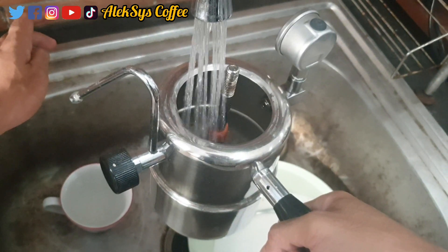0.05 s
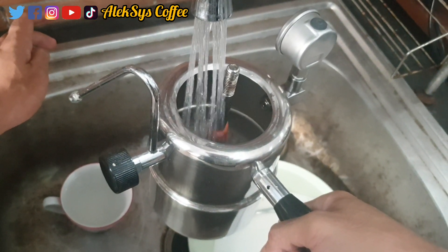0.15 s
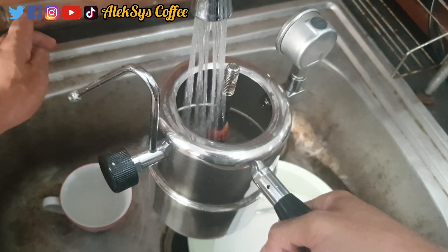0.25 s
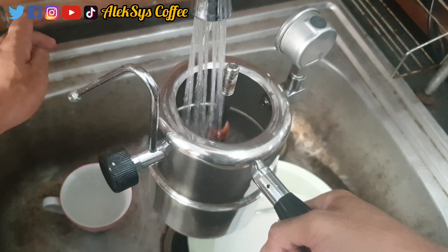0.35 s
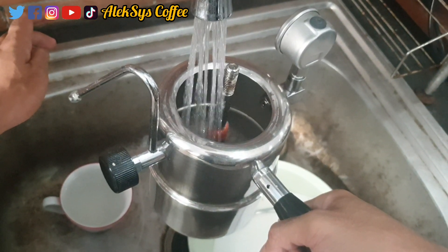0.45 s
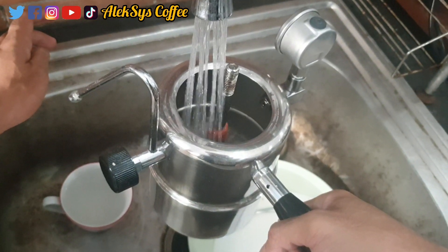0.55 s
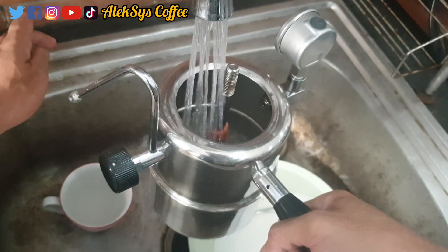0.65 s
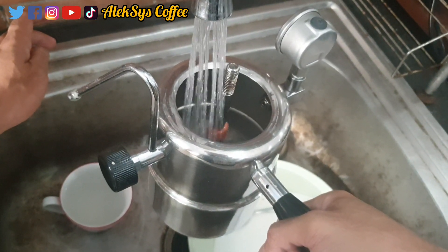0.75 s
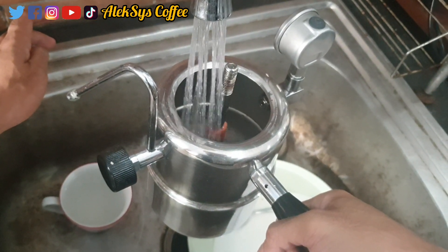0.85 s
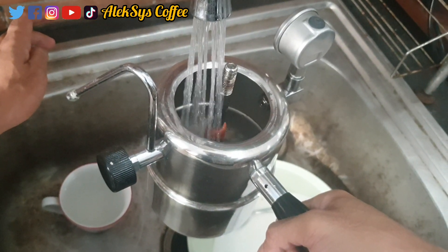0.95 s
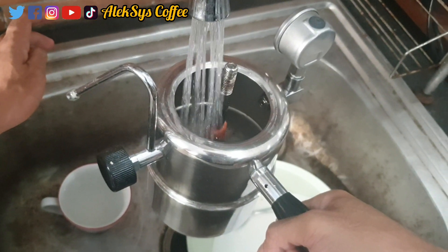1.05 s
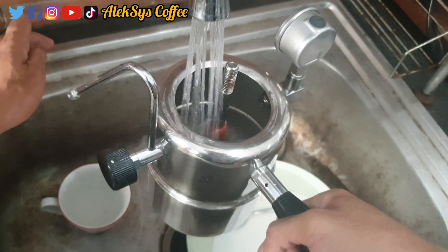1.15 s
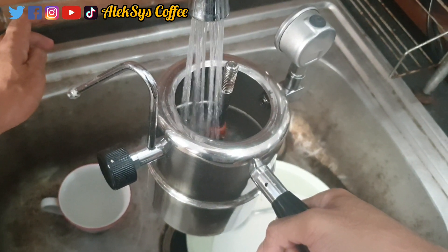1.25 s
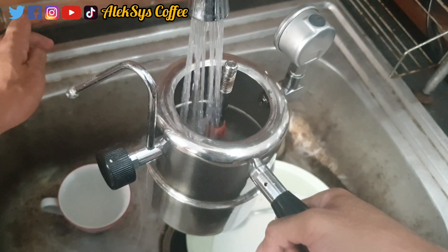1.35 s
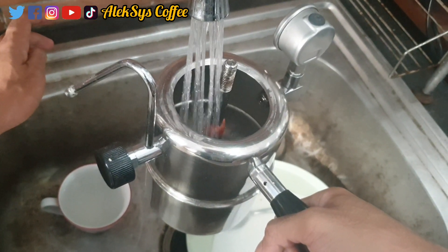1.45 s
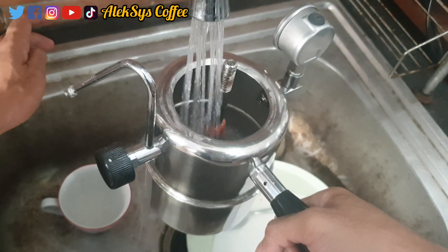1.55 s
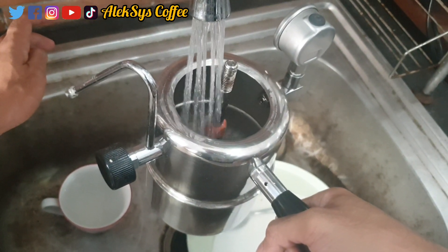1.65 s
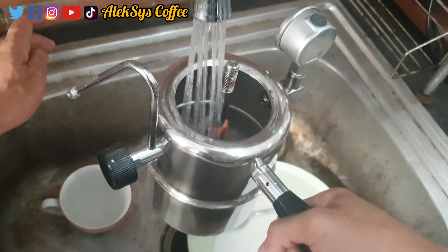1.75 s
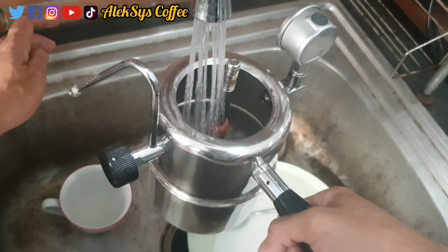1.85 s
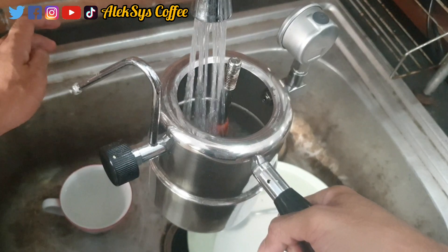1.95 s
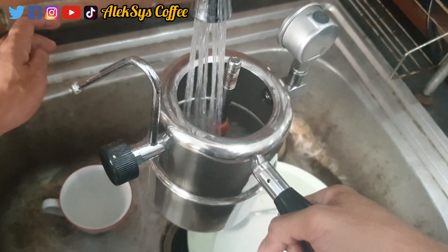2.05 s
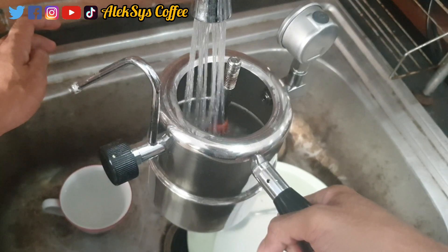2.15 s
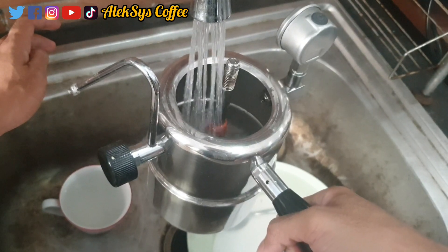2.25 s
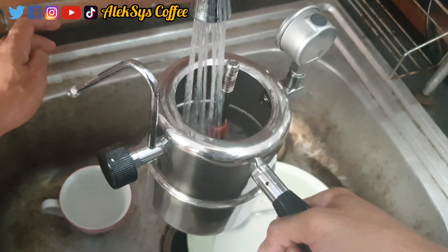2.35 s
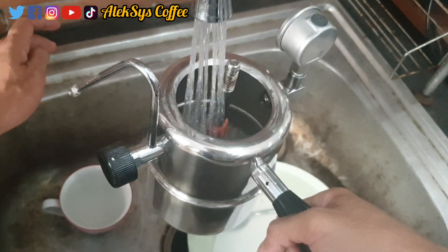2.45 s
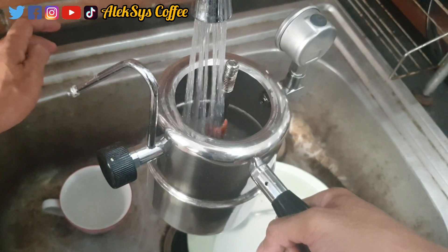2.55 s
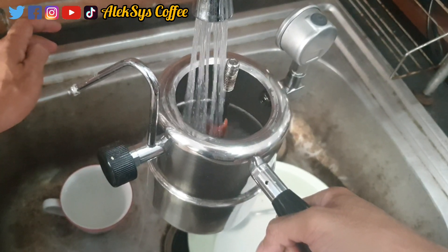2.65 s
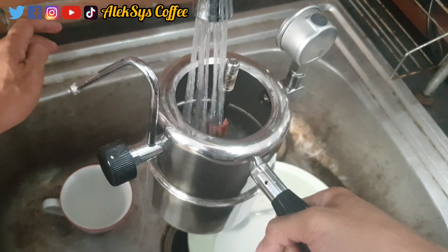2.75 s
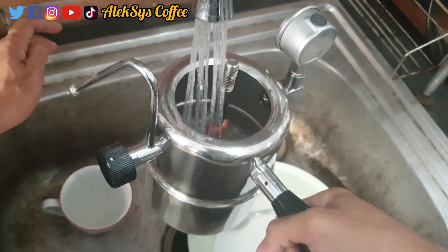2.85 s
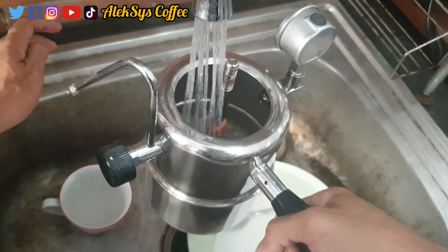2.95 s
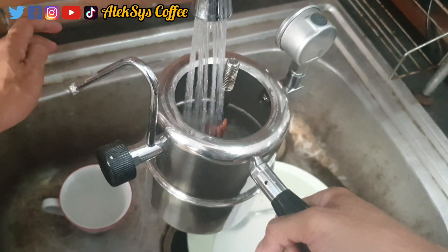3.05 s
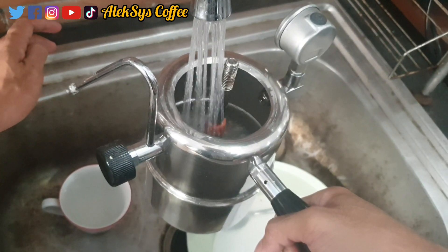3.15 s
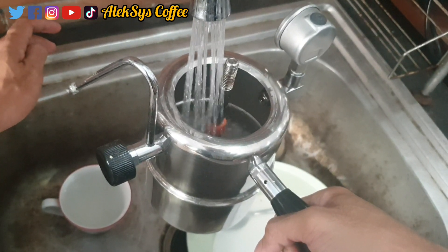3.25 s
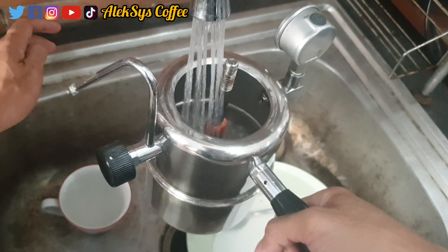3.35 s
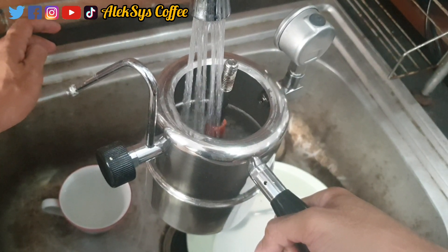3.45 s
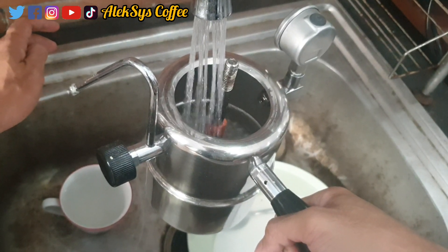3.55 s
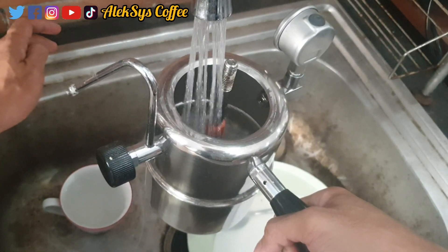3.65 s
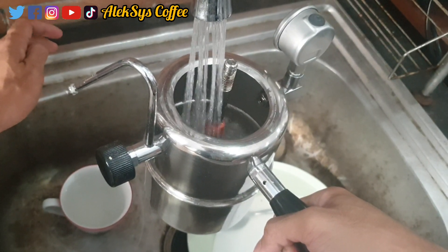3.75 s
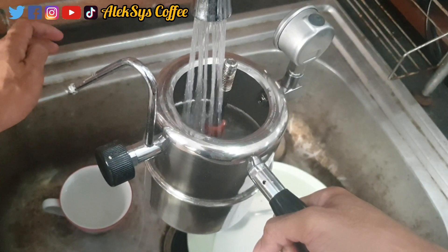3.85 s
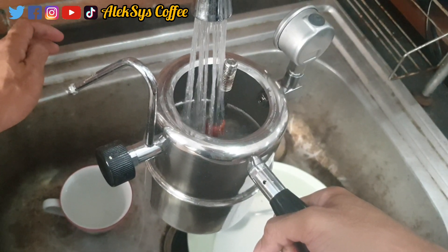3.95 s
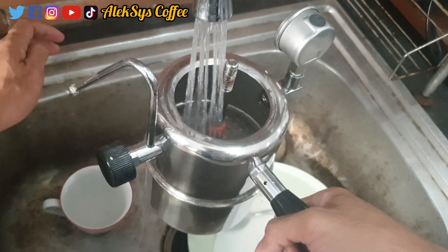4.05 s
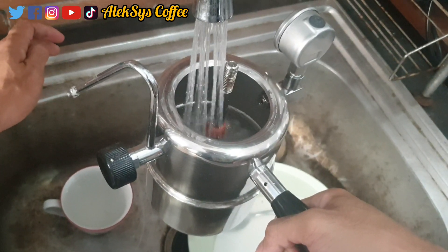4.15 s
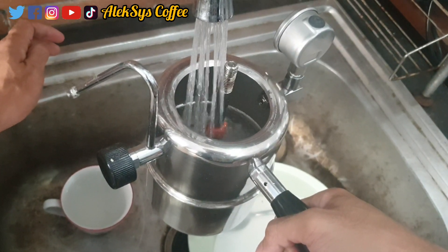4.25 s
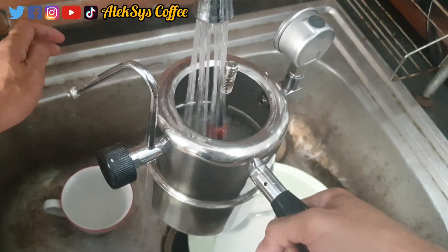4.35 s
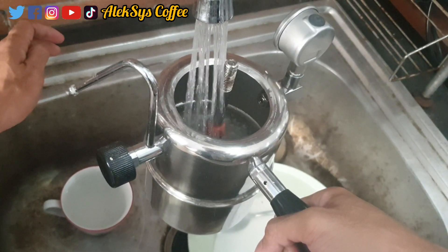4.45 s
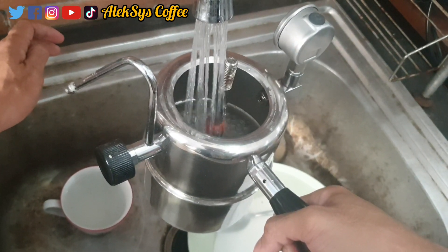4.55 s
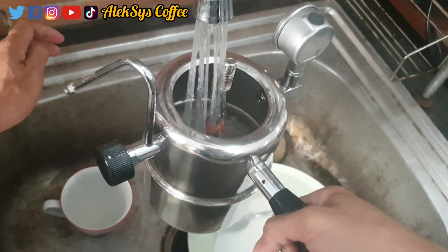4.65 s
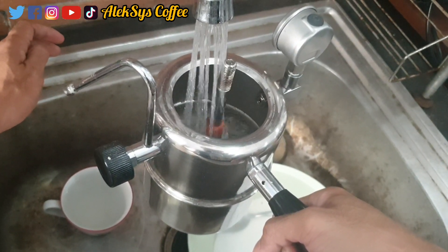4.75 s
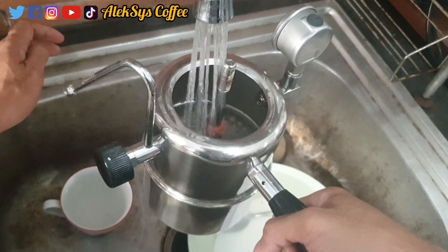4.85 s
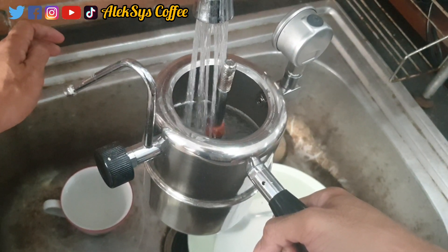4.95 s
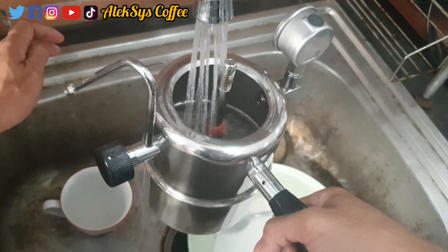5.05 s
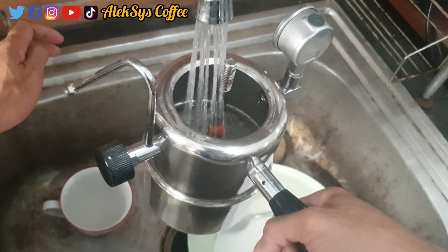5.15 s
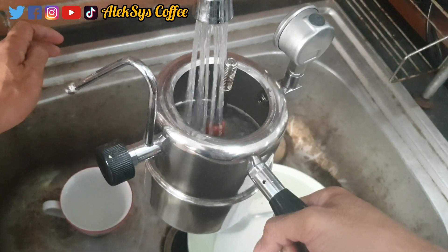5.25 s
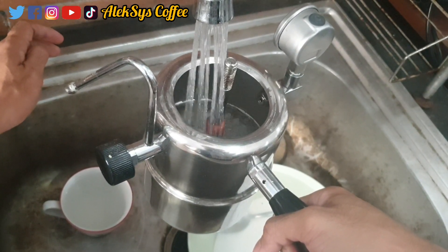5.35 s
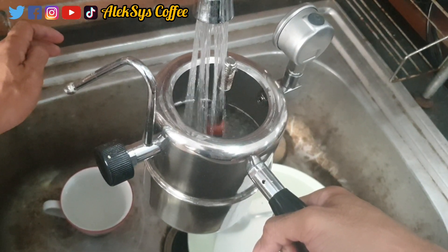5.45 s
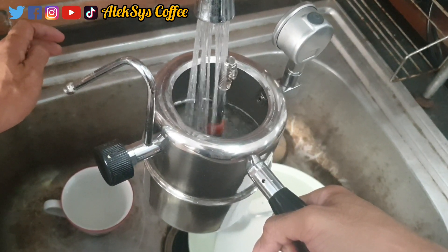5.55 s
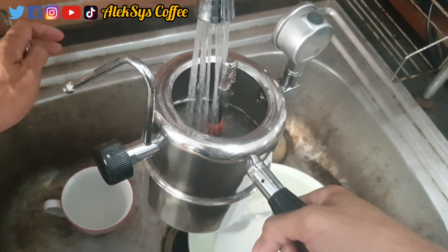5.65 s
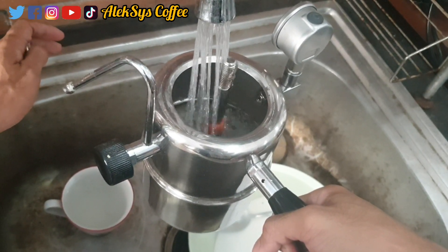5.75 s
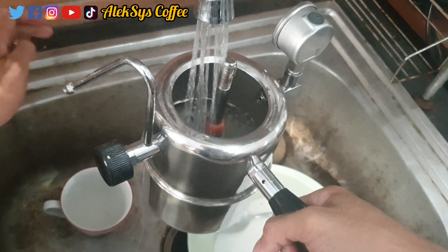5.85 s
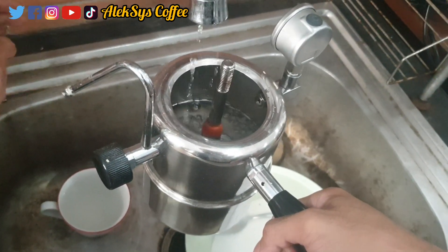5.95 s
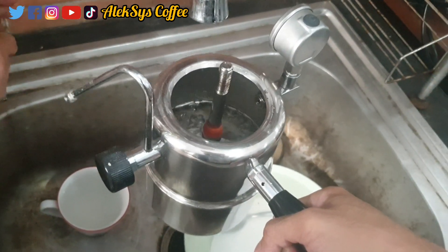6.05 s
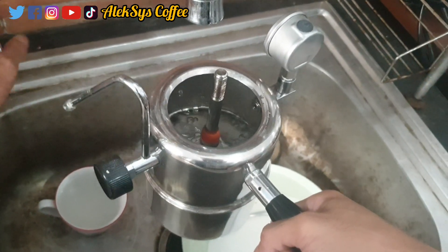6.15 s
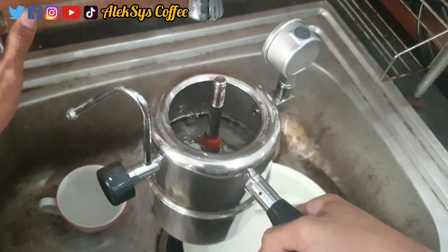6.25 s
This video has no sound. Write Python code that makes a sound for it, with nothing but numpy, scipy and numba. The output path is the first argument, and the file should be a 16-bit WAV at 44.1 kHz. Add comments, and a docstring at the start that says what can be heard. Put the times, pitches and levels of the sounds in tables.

```python
"""You hear water hissing, gulping and ticking into a small steel pot in a kitchen sink, until the tap is shut.
Jets from the spray tap drag air under as bubbles and make the steel ring. The air above the water
sounds hollow, and its overtones climb as the pot fills. The pipes rumble softly underneath.
A hand-held phone listens close by: its right microphone is open, while the left one is covered
by the hand and hears muffled water with the hand's rubs and knocks."""
import sys
import numpy as np
from scipy import signal
from scipy.fft import rfft, irfft, next_fast_len
from scipy.io import wavfile
from scipy.ndimage import uniform_filter1d
from numba import njit

SR = 44100
rng = np.random.default_rng(int(sys.argv[2]) if len(sys.argv) > 2 else 0)


def unload_wav(signal):
    """Save mono or channel-first audio to the path in sys.argv[1] as 16-bit WAV at rate SR, clipped to [-1, 1]."""
    wavfile.write(
        sys.argv[1],
        SR,
        np.round(np.clip(np.atleast_2d(signal).T, -1, 1) * 32767).astype(np.int16),
    )


N = 278006
T = np.arange(N) / SR
SHUT_S = 5.92  # the tap is shut


def undb(db):
    """Turn decibels into a factor to multiply by."""
    return 10 ** (np.asarray(db) / 20)


def level(x, db):
    """Scale a sound to an average (rms) level."""
    return x * undb(db) / np.sqrt(np.mean(x ** 2))


def curves(table):
    """Join a table's points in time with straight lines: one curve for each value column."""
    times, *columns = np.transpose(table)
    return [np.interp(T, times, column) for column in columns]


def shut(db_per_s):
    """Change in dB: zero while the tap runs, then falling steadily."""
    return -db_per_s * np.maximum(T - SHUT_S, 0)


@njit
def moving_band(x, hz, width):
    """A filter that lets through the sound near one pitch; that pitch may move."""
    y, mid, low, tuning, damping = np.empty(len(x)), 0., 0., 0., 0.
    for i in range(len(x)):
        if i % 16 == 0:
            tuning, damping = np.tan(np.pi * hz[i] / SR), width[i] / hz[i]
        swing = (mid + tuning * (x[i] - low)) / (1 + tuning * (tuning + damping))
        mid, low = 2 * swing - mid, low + 2 * tuning * swing
        y[i] = damping * swing
    return y


def band(x, hz, width):
    """One resonance, a pitch at which something likes to ring; the width is in Hz too."""
    return moving_band(x, hz + 0. * T, width + 0. * T)


def steep_band(x, hz, width):
    """The same resonance twice, so less gets through on either side."""
    return band(band(x, hz, width), hz, width)


def modes(x, table):
    """Add up resonances (f/Hz, width/Hz, level/dB), flipping the sign of every other one."""
    return sum((-1) ** k * undb(db) * steep_band(x, hz, width) for k, (hz, width, db) in enumerate(table))


def noise(flicker_db=0, flicker_hz=20):
    """Noise whose loudness flickers at random around a steady average."""
    step = int(SR / flicker_hz)
    stairs = np.repeat(rng.standard_normal(N // step + 1), step)
    walk = uniform_filter1d(uniform_filter1d(stairs, step), step)[:N]
    walk = walk - uniform_filter1d(walk, 6 * step)  # take out slow drift
    return rng.standard_normal(N) * undb(flicker_db * walk / walk.std())


def colour(x, spectrum):
    """Turn pitches up or down along a curve of (f/Hz, level/dB) points."""
    hz, db = np.transpose(spectrum)
    n = next_fast_len(N)
    freqs = np.maximum(np.arange(n // 2 + 1) * SR / n, 1)
    gain = undb(np.interp(np.log(freqs), np.log(hz), db))
    return irfft(rfft(x, n) * gain, n)[:N]


@njit
def ring(starts, hz, sizes, cycles, glide, rise):
    """Bubble tones: swell over `rise` cycles, fade 60 dB over `cycles`, go up by the share `glide`."""
    y = np.zeros(N)
    for j in range(len(starts)):
        length, start = cycles / hz[j] * SR, int(starts[j] * SR)
        phase, fade, held_back = 0., sizes[j], 1.
        fall, release = 1000. ** (-1 / length), np.exp(-hz[j] / SR / rise)
        for i in range(min(int(length), N - start)):
            phase += 2 * np.pi * hz[j] * (1 + glide * i / length) / SR
            fade, held_back = fade * fall, held_back * release
            y[start + i] += fade * (1 - held_back) * np.sin(phase)
    return y


def swarm(count, lo_hz, hi_hz, cycles, spread_db, glide, rise):
    """Bubbles at random times and pitches; a wider spread makes a few of them stand out."""
    when, pitch, loud = rng.random((count, 3)).T
    sizes = undb(-spread_db * np.log(1 - .995 * loud))
    hz = lo_hz * (hi_hz / lo_hz) ** pitch
    return level(ring(when * N / SR, hz, sizes, cycles, glide, rise), 0)


def listed_rings(table, cycles, glide, rise):
    """One bubble tone for each row (t/s, level/dB, f/Hz)."""
    starts, db, hz = np.transpose(table)
    return ring(starts, hz, undb(db), cycles, glide, rise)


def ragged(x, share=.31):
    """Roughen a tone by shaking its loudness at random."""
    return x * (1 - share + share * level(band(noise(), 250, 1100), 0))


def with_spatter(table, droplets=3, within_s=.03):
    """Each drop throws up weaker droplets that land just after it, at nearby pitches."""
    starts, db, hz = np.repeat(table, droplets, axis=0).T
    late, weak, bend = rng.random((len(starts), 3)).T
    small = np.transpose([starts + .004 + within_s * late, db - 9.5 - 8 * weak, hz * (.85 + .283 * bend)])
    return np.vstack([table, small])


def air_overtones(lift_db):
    """Two high resonances of the air in the pot, which climb as it fills."""
    # t/s, first f/Hz, second f/Hz, second level/dB
    overtones = [(0, 1790, 2527, -16.5), (2.6, 2070, 2680, -21), (3.1, 2120, 2780, -25),
                 (3.6, 2100, 2910, -21.5), (6.3, 2280, 2986, -15.5)]
    first_hz, second_hz, second_db = curves(overtones)
    wander = 1 + .015 * level(band(noise(), 7, 12), 0)  # the surface heaves
    return [(first_hz, 550, -19.5 - .47 * T + lift_db), (second_hz * wander, 193, second_db + lift_db)]


def basin_modes(lift_db):
    """Resonances of pot and sink that hold their pitch while their strength changes."""
    # f/Hz, width/Hz, level/dB
    basin = [(290, 110, -38), (530, 80, -12), (765, 110, -16), (945, 130, -23), (1060, 70, -30),
             (1375, 170, -31), (1715, 80, -27), (1900, 60, -17)]
    rows = []
    for hz, width, db in basin:
        if hz > 850:  # rung by the jets themselves
            db = db + lift_db
        if 850 < hz < 1200:  # these open up as the water nears the rim
            db = db + 1.14 * T
        if 700 < hz < 850:
            db = db - .2 * T
        rows.append((hz, width, db))
    return rows


def churn(air_note, cloud_note, spray_db):
    """Jets drag air under; swirling water and big bubbles stir up the hollow notes of pot and sink."""
    # loudest at half depth, then damped by the deepening water: t/s, level/dB
    loudness = [(0, -38), (.8, -34.5), (1.3, -32), (2.9, -29.5), (3.6, -34), (4.8, -37), (5.85, -38.5)]
    slosh_db = 1.5 * np.exp(-((T - SHUT_S) / .036) ** 2)  # the collapsing jets drop in at once
    churn_db = curves(loudness)[0] + slosh_db + shut(db_per_s=134.5)
    bubbles = swarm(count=1500, lo_hz=366, hi_hz=2823, cycles=18.2, spread_db=0, glide=.2, rise=.37)
    push = noise(.33, 25.21) + undb(-16) * bubbles
    # the high resonances follow the spray's loudness, but die away more slowly
    lift_db = spray_db + 2 - churn_db - shut(db_per_s=122)
    bottom = (300, 70, -9 - 20 * T)  # the thinly covered bottom booms until the water damps it
    body = modes(push, [air_note, cloud_note, bottom] + air_overtones(lift_db))
    body = body + modes(push, basin_modes(lift_db))
    body = body - band(body, 872, 110)  # two resonances of the sink cancel here
    hollow = undb(churn_db) * body
    wanted_rms = np.std(undb(churn_db) * level(push, -.36))
    return hollow * wanted_rms / hollow.std()


def steel_ring(push):
    """Steel and hollows ring unevenly under the shifting jets, and change as water loads the wall."""
    # empty f/Hz, full f/Hz, width/Hz, empty level/dB, full level/dB
    steel = [(3650, 4100, 490, 6, -8), (4980, 4990, 40, -1.5, 8), (5650, 5420, 220, -1.5, 4),
             (6570, 6500, 91, -10, 4), (7210, 7100, 260, -6.5, 5), (7570, 7510, 90, -9, 8),
             (8560, 8570, 280, -5, 3.5), (8970, 8970, 150, 6.5, 8), (10180, 10200, 160, -1.5, 4),
             (10830, 10830, 230, -8, -1), (11660, 11750, 450, -3, -0.5), (12800, 12750, 320, -4, -6),
             (14000, 14000, 300, -6, 0), (14550, 9000, 60, -9, -3)]
    filled = T / T[-1]
    ringing = np.zeros(N)
    for empty_hz, full_hz, width, empty_db, full_db in steel:
        flicker_db = 2.5 * level(band(noise(), 3.9, 8.7), 0)
        db = empty_db + (full_db - empty_db) * filled + flicker_db
        ringing += undb(db) * band(push, empty_hz + (full_hz - empty_hz) * filled, width)
    return ringing


def spray():
    """The hiss of the jets and of tiny bursting bubbles, coloured by the steel."""
    # tone of the hiss: f/Hz, level/dB
    spectrum = [(590, -61), (1000, -29), (1160, -11.5), (1910, -2), (2580, -10), (4380, -11.5), (4870, -6),
                (7990, -5), (8870, -1.5), (13100, -4), (15800, -3.5)]
    fizz = swarm(count=2500, lo_hz=4640, hi_hz=15800, cycles=60, spread_db=2, glide=.16, rise=.28)
    spatter = swarm(count=1200, lo_hz=5860, hi_hz=15000, cycles=14, spread_db=3.5, glide=.046, rise=.25)
    jets = band(noise(1.4, 55), 4500, 6000) + band(noise(1.2, 90), 11500, 9000)
    fizz_db = -5.5 - .8 * T  # weaker as the water has less far to fall
    push = level(jets, 0) + undb(fizz_db) * fizz + undb(-8.5) * spatter
    push = push + steel_ring(push)
    sizzle = undb(4.5 * T) * level(steep_band(push, 13002, 2600), -33.5)  # grows as the surface rises
    return level(colour(push, spectrum), -1.31) + sizzle


def plumbing():
    """The low rumble of pipe and sink, with a steadier hum on top."""
    # t/s, rumble level/dB, hum level/dB
    loudness = [(0, -69, -75), (.42, -75, -76), (.46, -59, -62), (1.7, -61, -63.5), (2.4, -58, -59.5),
                (3.05, -55, -64), (3.9, -60, -63.5), (4.6, -58.5, -60), (5.1, -57, -61), (5.75, -57.5, -53),
                (5.9, -58, -49), (5.96, -56.5, -68), (6.3, -61.5, -66)]
    rumble_db, hum_db = curves(loudness)
    deep = level(band(band(noise(2, 5), 90, 90), 90, 140), -2)
    pipe = level(band(noise(), 89, 24), -7)
    upper = level(steep_band(noise(), 212, 120), -13.5)
    hum = level(band(band(noise(), 158, 5), 158, 30), -1.7)
    return undb(rumble_db) * (deep + pipe + upper) + undb(hum_db) * hum


def room_noise():
    """The faint background rush of the kitchen."""
    # f/Hz, level/dB
    spectrum = [(120, -42), (200, -5), (681, 4), (879, -7), (1020, 1), (1760, -14), (2320, -11),
                (11400, -8), (15800, -17)]
    return level(colour(noise(1, 10), spectrum), -59)


def single_bubbles():
    """Single bubbles ring out of the stream, from deep glugs to small plinks with a little splash."""
    # t/s, level/dB, f/Hz
    bubbles = [(0.1306, -31, 3600), (0.173, -22, 3880), (0.2389, -25, 3680), (0.4229, -28.5, 3600),
               (0.5526, -31, 1840), (0.6165, -28, 3600), (0.7452, -29, 3580), (0.8505, -30.5, 3720),
               (1.1223, -31, 3870), (1.1732, -29, 3780), (1.3179, -30, 1900), (1.4696, -28, 3900),
               (1.5052, -25, 1950), (1.707, -31.5, 3740), (1.7554, -29, 3950), (1.8262, -31, 3880),
               (1.9358, -28, 2080), (2.1969, -32, 3850), (2.2243, -31, 3800), (2.4558, -27, 3620),
               (2.4698, -32, 2200), (2.4838, -30, 4000), (2.9886, -31.5, 3930), (3.0761, -33, 1910),
               (3.5079, -34, 3960), (3.8432, -33.5, 2190), (4.4418, -31, 2290), (4.592, -29, 399),
               (5.026, -27, 379), (5.248, -30, 382), (1.615, -32, 767), (1.80, -32, 724),
               (2.78, -29.5, 737), (3.95, -29.5, 722), (5.949, -32.5, 693), (6.008, -37, 700)]
    tones = listed_rings(with_spatter(bubbles), cycles=52.5, glide=.078, rise=.93)
    outline = uniform_filter1d(np.abs(band(tones, 3700, 2000)), size=60)
    splash = outline * band(noise(), 3600, 2500)
    return ragged(tones) + undb(-12) * splash


def drop_ticks():
    """Drops land with a short crack, a bright ring and a trailing splat."""
    # t/s, level/dB, f/Hz
    drops = [(0.174, -29, 8800), (0.2394, -19, 5330), (0.5783, -29, 8980), (0.715, -24, 8970),
             (1.0502, -52, 8940), (1.898, -18, 5540), (1.9906, -23, 10300), (2.106, -26, 8900),
             (2.3121, -27, 11900), (2.3825, -27, 9290), (2.471, -23, 9000), (2.5634, -25, 8700),
             (2.8405, -19, 13500), (3.0974, -22.5, 9500), (3.2094, -25.5, 5760), (3.362, -25, 8270),
             (3.4516, -34, 9300), (3.6256, -24, 9350), (4.0372, -27, 9500), (4.468, -31, 5650),
             (4.7032, -25.5, 7050), (4.7734, -27, 10600), (4.9696, -30, 8900), (5.466, -26, 9350),
             (5.64, -32, 5750), (5.878, -32, 5500), (5.918, -41, 5700), (5.94, -40, 5650)]
    tones = ragged(listed_rings(with_spatter(drops), cycles=89, glide=.055, rise=.73))
    cracks = undb(5.5) * listed_rings(drops, cycles=15, glide=.05, rise=.3)
    outline = uniform_filter1d(np.abs(listed_rings(drops, cycles=140, glide=0., rise=3.3)), size=24)
    splats = undb(-3) * outline * rng.standard_normal(N)
    return band(tones + cracks + splats, 8000, 14000)


def gulps(air_hz, cloud_hz, shallow_until_s=1.05):
    """Big bubbles close under the jets: at the cloud note while shallow, then just under the air note."""
    # t/s, level/dB
    big_bubbles = [(0.249, -4.5), (0.482, -11), (0.652, -4), (0.675, -7.5), (0.972, -11.5), (1.009, -9.5),
                   (1.086, -14), (1.206, -10.5), (1.385, -11.5), (1.452, -8.5), (1.512, -12),
                   (1.655, -16.5), (1.742, -11.5), (1.826, -7), (1.935, -5.5), (2.19, -13.5), (2.403, -16),
                   (2.503, -17), (2.581, -12), (2.608, -7.5), (3.176, -14), (3.255, -20), (3.308, -8.5),
                   (3.37, -9.5), (3.417, -7), (3.473, -11.5), (3.521, -10.5), (3.617, -16.5), (3.842, -14),
                   (4.667, -15.5), (5.243, -12.5), (5.567, -13)]
    pitch = np.where(T < shallow_until_s, cloud_hz, .95 * air_hz)
    rows = [(start, db, pitch[int(start * SR)]) for start, db in big_bubbles]
    return band(listed_rings(rows, cycles=23.4, glide=.083, rise=3.4), 548, 227)


def hand_rubs():
    """The hand scrapes on the covered microphone: a low noise that swells and fades."""
    # peak t/s, peak level/dB, slope on both sides/(dB per s)
    rubs = [(.45, -82, 14), (2.85, -70, 22), (5.27, -58, 62)]
    gain = undb(-90) + sum(undb(db - slope * np.abs(T - peak_s)) for peak_s, db, slope in rubs)
    return gain * level(band(band(noise(2, 12), 60, 90), 60, 120), 0)


def tap_whistle(start_s=2.35):
    """The running tap starts to whistle, faint and very high."""
    # f/Hz, width/Hz, level/dB compared with the spray
    tones = [(13240, 150, -19), (13430, 130, -16)]
    whistle = sum(level(band(noise(1.7, 8.7), hz, width), db) for hz, width, db in tones)
    return whistle * np.clip((T - start_s) / .2, 0, 1)


def hand_knocks(phase_rad):
    """The hand knocks the phone and its case rings, high notes first; blunt knocks have less treble."""
    # t/s, level/dB, treble level/dB
    knocks = [(2.639, -29.5, -1), (3.603, -48, 0), (4.0795, -29.5, -1), (5.772, -45, -6),
              (5.870, -22.5, -16)]
    # notes of the case: f/Hz, delay/s, time to fade by 60 dB/s, level/dB
    case = [(1000, .003, .025, -17), (345, .004, .026, 4), (215, .005, .04, 0), (78, .0105, .08, 6.5),
            (48, .022, .12, -1)]
    out, t = np.zeros(N + SR), T[:SR // 2]
    for knock_s, db, treble_db in knocks:
        for hz, delay_s, fade_s, note_db in case:
            start = int((knock_s + delay_s) * SR)
            size = undb(db + note_db + treble_db * np.clip(hz / 170 - 1, 0, 1))
            phase = phase_rad * (.5 if hz > 150 else 1)  # high notes reach both microphones more alike
            outline = np.tanh(hz * t) * 1000 ** (-t / fade_s)
            out[start:start + len(t)] += size * outline * np.sin(2 * np.pi * hz * t + phase)
    return out[:N]


def scene():
    """The sink as heard by the covered left microphone and the open right one."""
    # hollow notes of the air in the pot and of the bubble cloud:
    # t/s, air f/Hz, air width/Hz, cloud f/Hz, cloud width/Hz, cloud level/dB
    notes = [(0, 666, 128, 494.3, 32.4, 11.5), (.9, 610, 133, 482.4, 56.3, 4),
             (1.9, 564.4, 91, 434, 97, -10.5), (3.0, 595.4, 72, 428, 110, -12),
             (4.2, 625, 116.2, 391.5, 80.4, -8), (5.7, 652, 220, 377, 61, -12.5),
             (6.1, 700, 196, 380, 61, 1)]
    # what gets past the hand: f/Hz, width/Hz, level/dB
    leak = [(510, 340, -39.5), (426, 45, -28.5), (694, 52, -36), (1790, 130, -28.5), (865, 34, -16)]
    air_hz, air_width, cloud_hz, cloud_width, cloud_db = curves(notes)
    spray_db = -37 - .4061 * T + shut(db_per_s=289)
    room = room_noise()
    water = churn((air_hz, air_width, 0), (cloud_hz, cloud_width, cloud_db), spray_db)
    water += single_bubbles() + gulps(air_hz, cloud_hz)
    water += undb(spray_db) * (spray() + tap_whistle()) + drop_ticks()
    kitchen = undb(5.5) * (water + plumbing() + room)
    covered = modes(kitchen, leak) + hand_knocks(phase_rad=0) + hand_rubs()
    uncovered = kitchen + undb(-3) * hand_knocks(phase_rad=-1.95)  # the case bends differently here
    return np.array([covered, uncovered])


def record(dry):
    """The covered microphone adds hiss, strongest where its opening rings; then bass and top are cut."""
    # the faint, broad part of the hiss: f/Hz, level/dB
    spectrum = [(100, -7.5), (600, -24), (1500, -25), (5000, -33), (9000, -43), (14000, -31.5)]
    opening = signal.sosfilt(signal.butter(6, [9900, 11500], "band", fs=SR, output="sos"), noise())
    hiss = level(opening, -66.5) + level(colour(noise(), spectrum), -74)
    wet = dry + np.array([hiss, np.zeros(N)])
    wet = signal.sosfilt(signal.butter(2, 35, "high", fs=SR, output="sos"), wet)
    return signal.sosfilt(signal.ellip(12, .2, 80, 15730, fs=SR, output="sos"), wet)


dry = scene()
out = record(dry)
unload_wav(out)
```